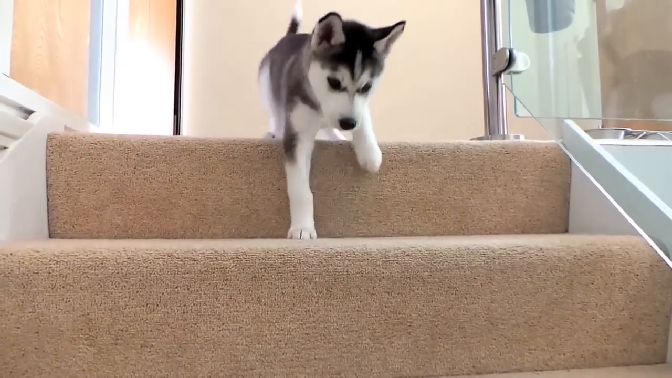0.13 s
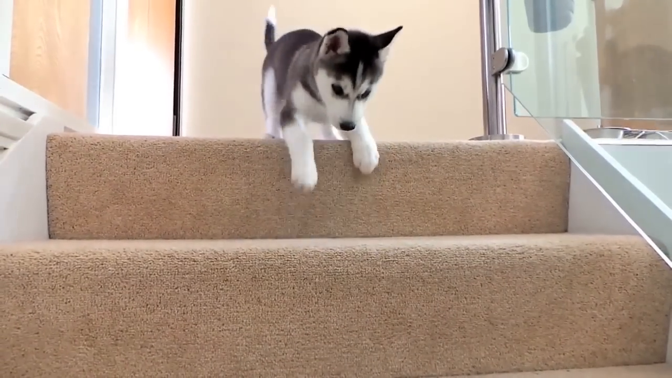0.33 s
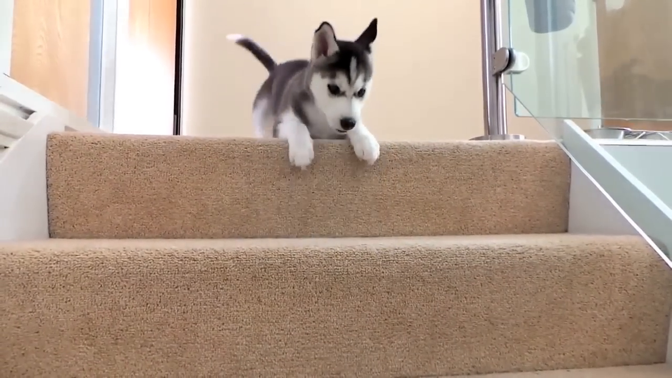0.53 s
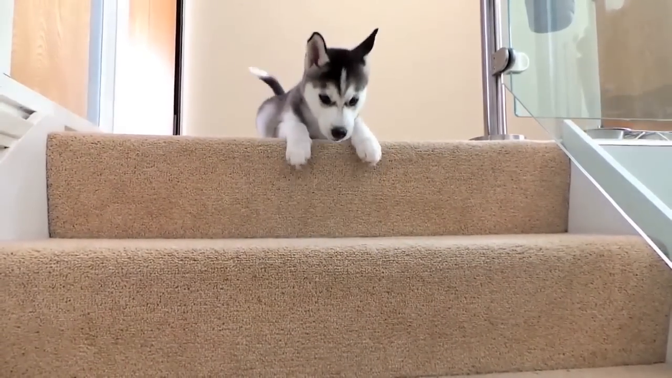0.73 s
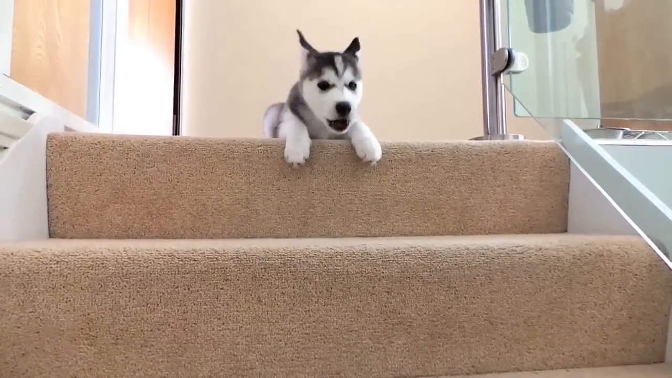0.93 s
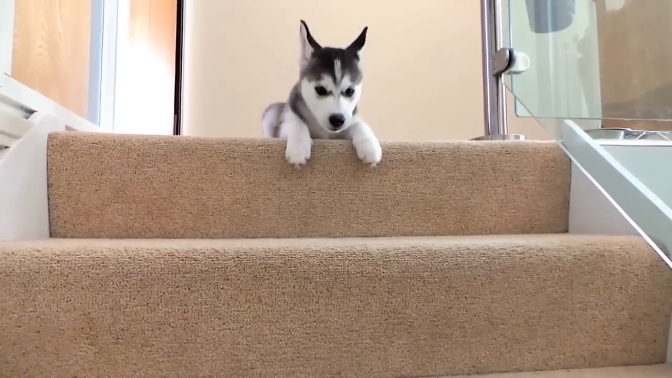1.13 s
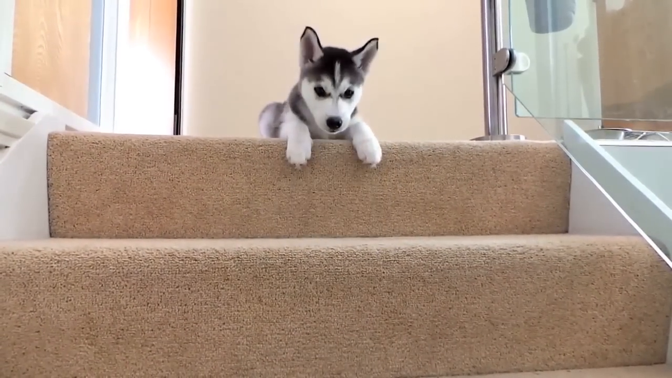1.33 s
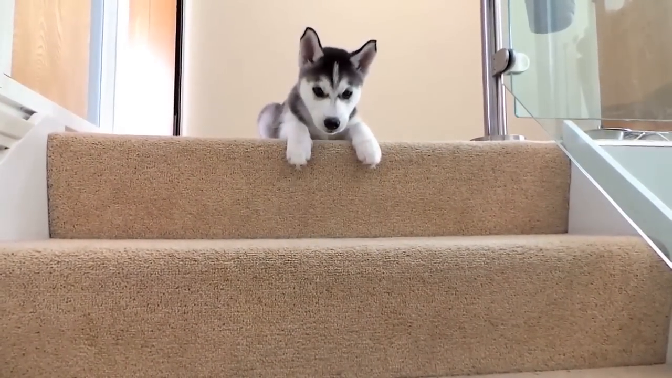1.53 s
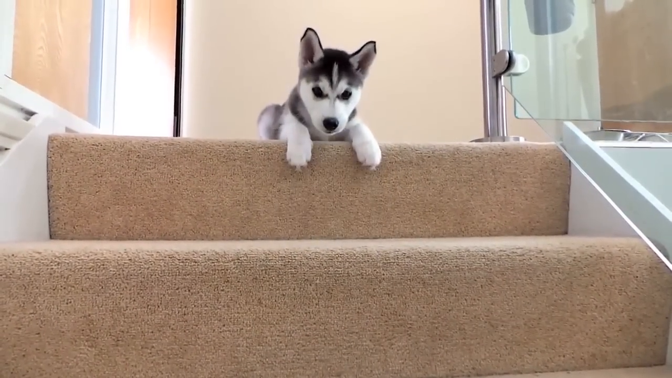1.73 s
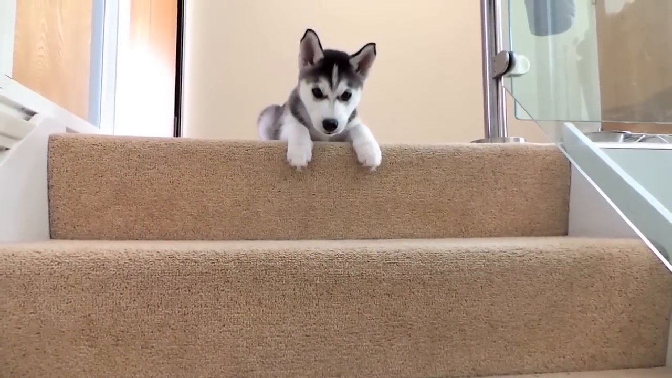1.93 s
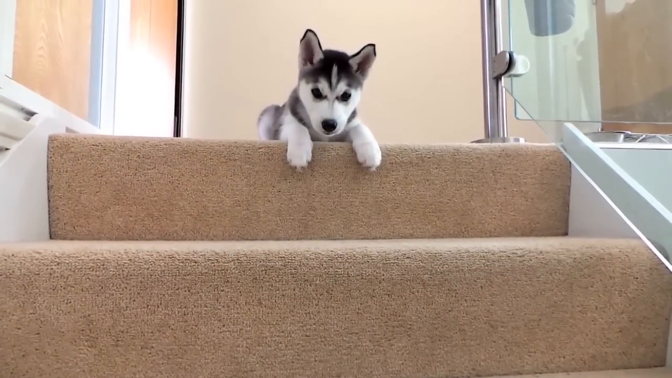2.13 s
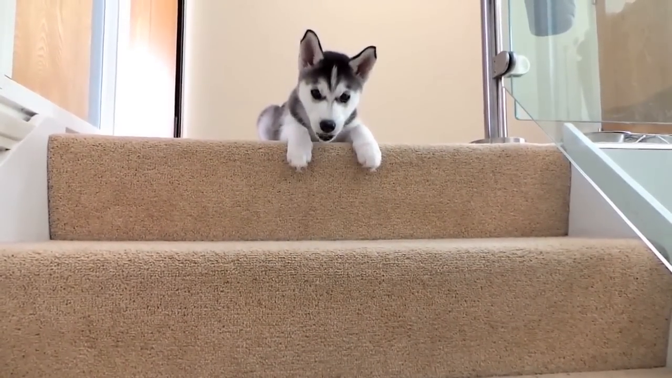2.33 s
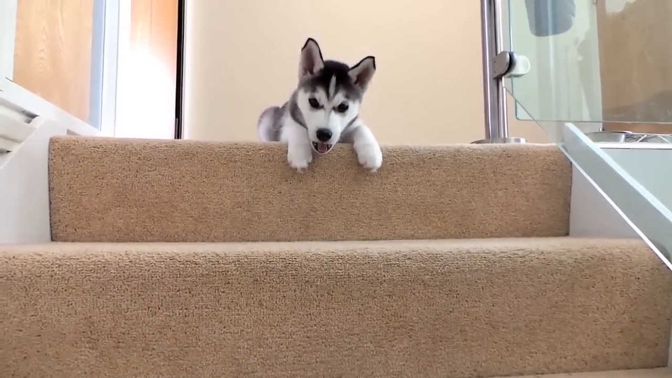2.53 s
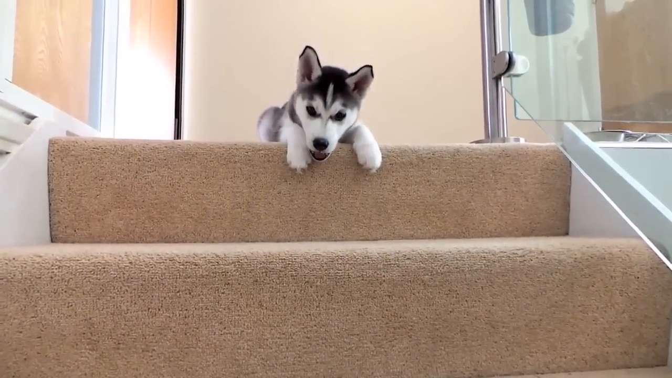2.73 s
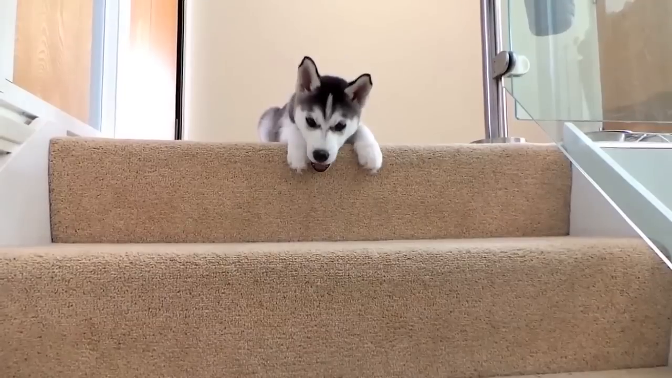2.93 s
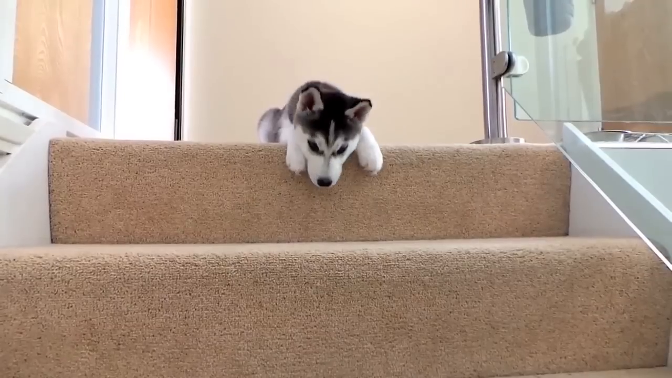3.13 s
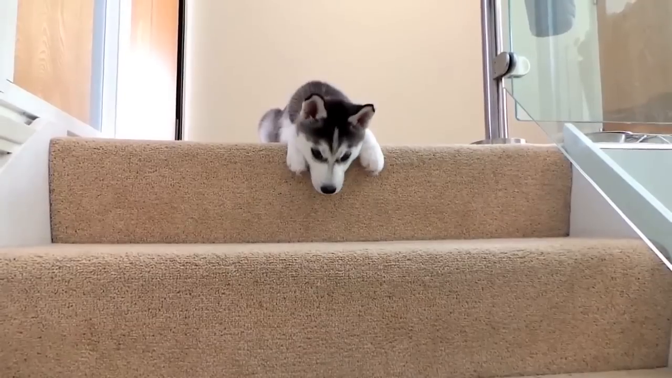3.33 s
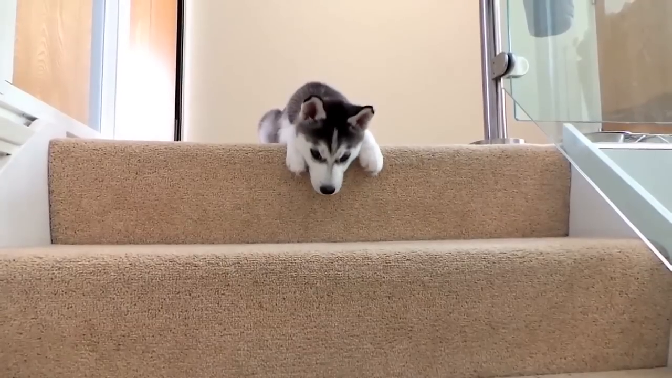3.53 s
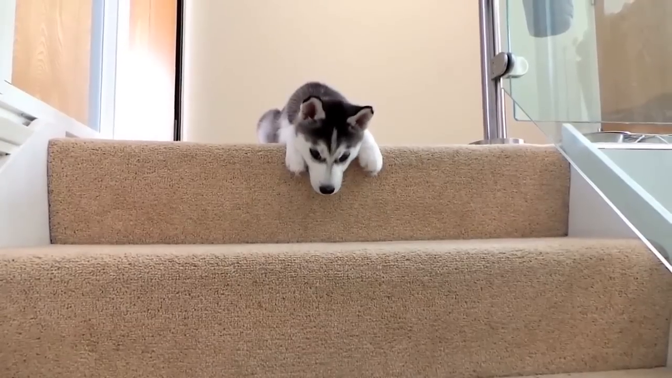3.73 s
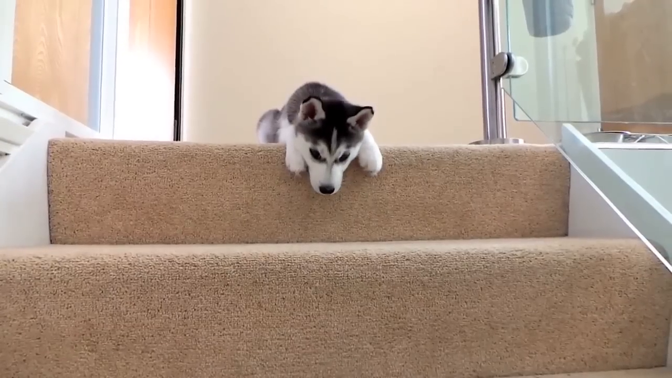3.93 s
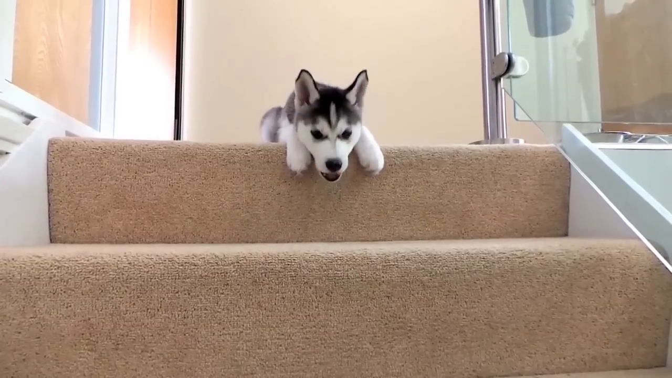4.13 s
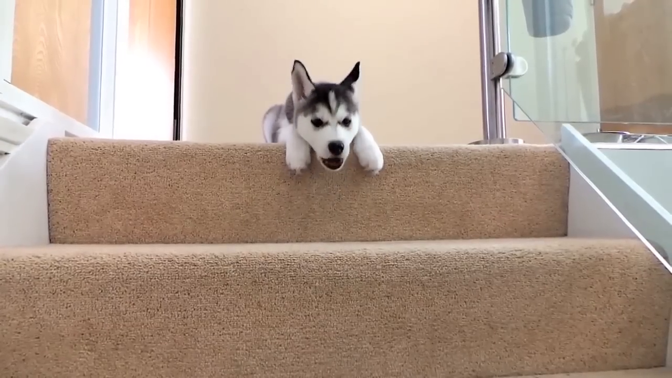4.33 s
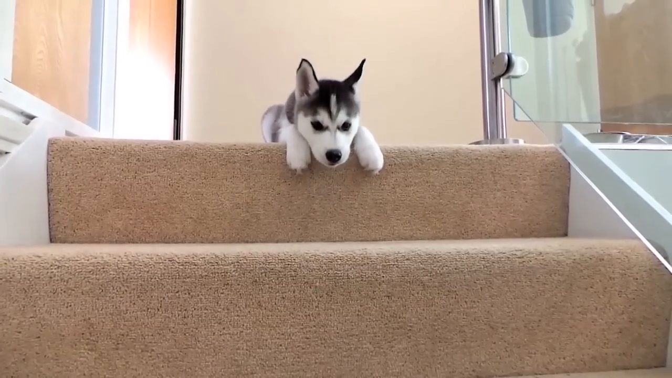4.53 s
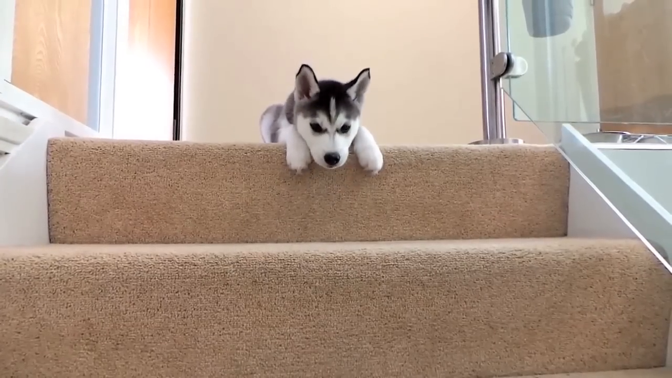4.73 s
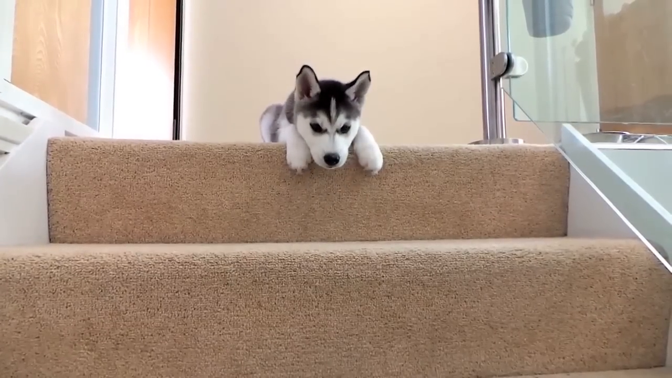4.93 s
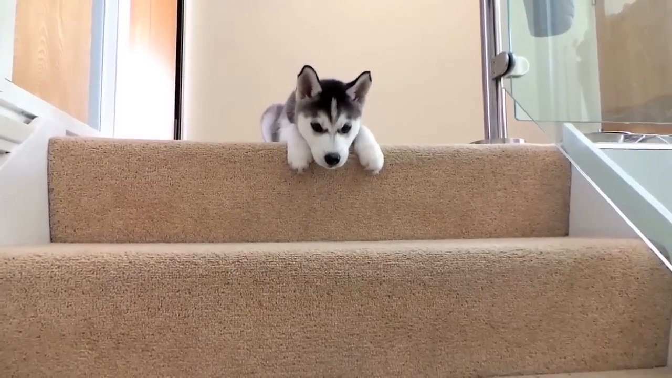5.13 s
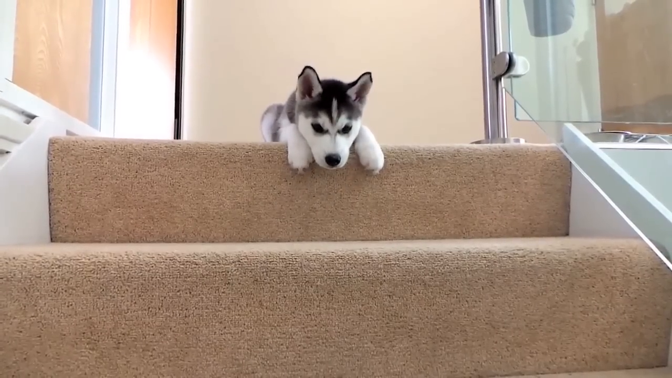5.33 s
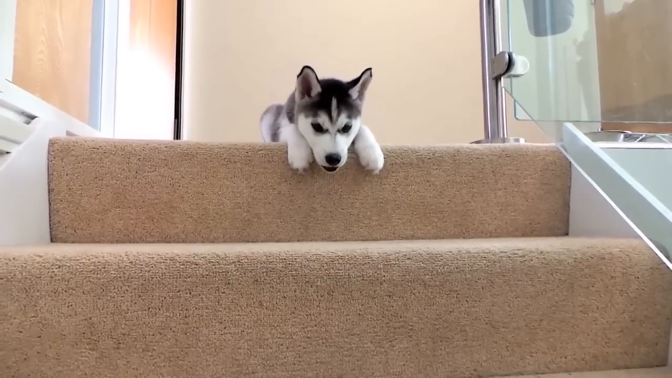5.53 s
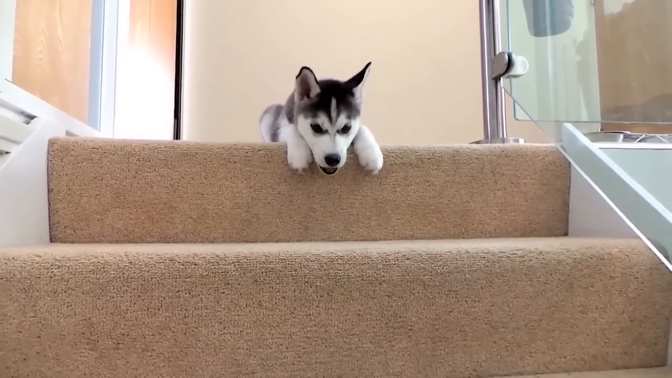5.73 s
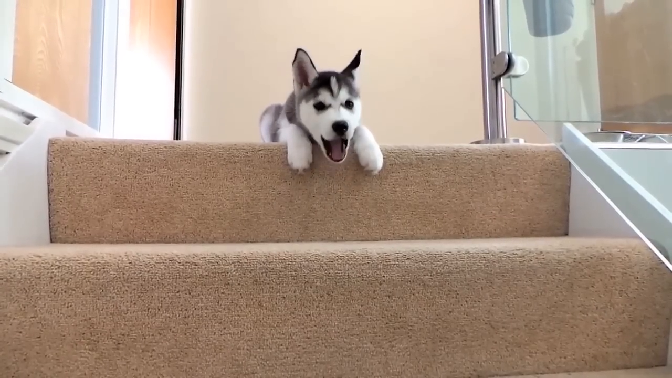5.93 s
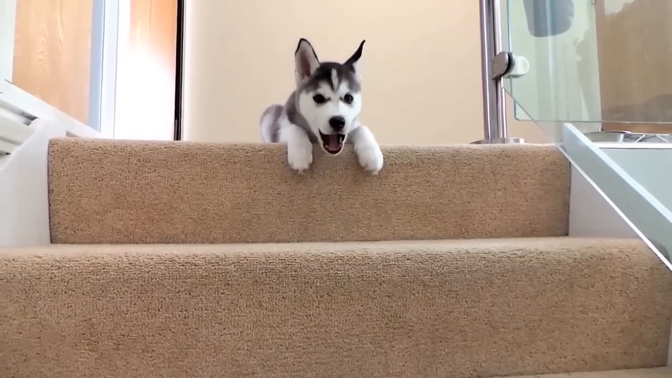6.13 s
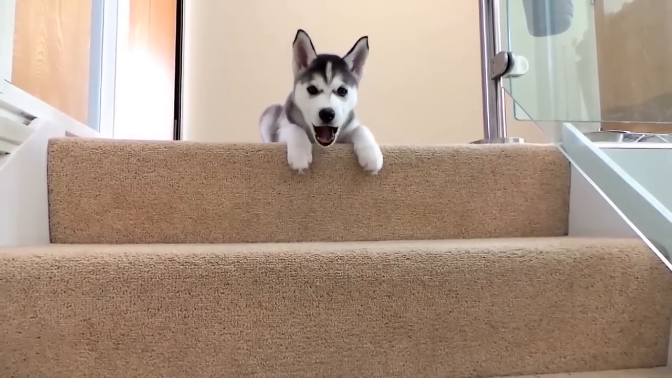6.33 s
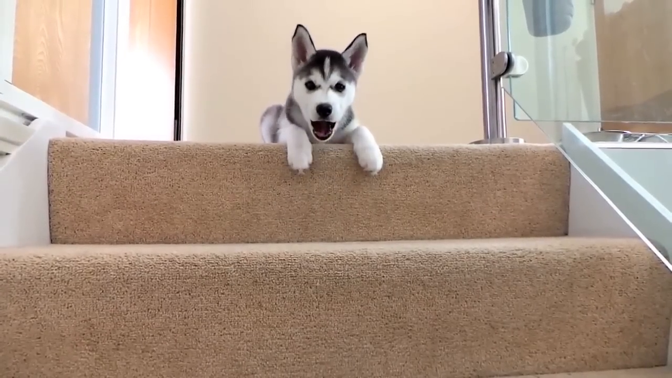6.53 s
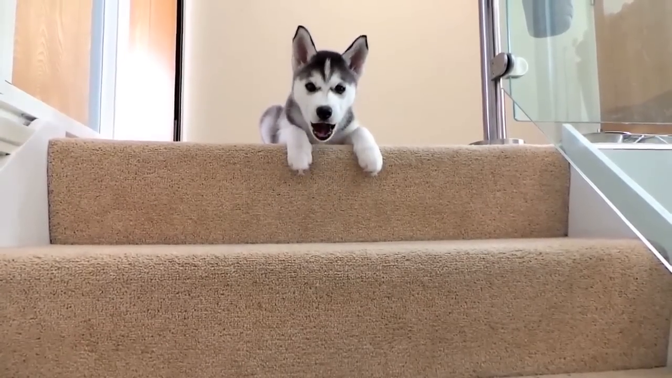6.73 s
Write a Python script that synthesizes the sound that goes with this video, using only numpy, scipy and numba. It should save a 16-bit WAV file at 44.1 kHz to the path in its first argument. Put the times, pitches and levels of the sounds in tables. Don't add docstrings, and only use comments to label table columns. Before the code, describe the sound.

A bare stairwell with short, bright echoes, picked up by a phone a few metres away; very faint mains hum and house rumble sink further in the pauses. Thin airy whistles near the top of hearing flicker at the start. A soft paw thud on carpet at 0.25 s, a firmer one at 0.6, then a faint whimper breaking into a sharp rising yip at 0.95-1.04. Near quiet until 2.45: a small squeak, a quavering high whistle, and a clear yelp at 2.85 that slides down as a whine until 3.4. At 4.1-4.45 two rough barks crack upward, the second dropping into a brief low grumble by 4.6. A barely audible claw tick at 4.98. At 5.63 a thin peep, then two joined piercing yaps at 5.85-6.05, the loudest, and a soft sinking whine from 6.15 to 6.4. Another tiny tick at 6.68 as the room settles.

```python
import sys
import numpy as np
from scipy import signal
from scipy.fft import rfft, irfft
from scipy.io import wavfile
from scipy.ndimage import uniform_filter1d, minimum_filter1d
from numba import njit

SR = 44100
rng = np.random.default_rng(int(sys.argv[2]) if len(sys.argv) > 2 else 0)


def amp(db):
    return 10 ** (np.asarray(db, float) / 20)


def write(x):
    x = np.atleast_2d(x).T
    wavfile.write(sys.argv[1], SR, np.round(np.clip(x, -1, 1) * 32767).astype(np.int16))


N = 303408

# [f/Hz, level/dB]
HOUSE_SPECTRUM = [(25, -20.5), (60, -19), (110, -6), (180, -14.5), (400, -17), (1100, -29.5), (4000, -37.5),
                  (12000, -38.5), (15500, -44.5)]
HOUSE_DB = -57.5
# [f/Hz, level/dB]
HUM = [(49.5, -75.5), (99, -56)]

# [f/Hz, t60/s]
STAIRWELL_DECAY = [(300, 0.7), (1100, 0.44), (3000, 0.3386), (5500, 0.42), (9000, 0.24)]
ECHO_DB, FIRST_ECHO_S = -1.5, 0.009

# [t/s, peak level/dB, thud f/Hz, ring t60/s]
PAW_STEPS = [
    (0.255, -33, 115, 0.088),
    (0.597, -24.5, 198.2, 0.069),
]
# [t/s, peak level/dB]
CLAW_TICKS = [
    (4.979, -51),
    (6.684, -42.5),
]

# [t/s, pitch f/Hz, level/dB, pressing of the voice (overtones against fundamental) level/dB]
WHIMPER = [
    (.612, 677, -45.5, -24.5),
    (.63, 688, -35.5, -35),
    (.655, 800, -32.5, -34.5),
    (.659, 1060, -28, -35.5),
    (.68, 1065, -45.5, -22.5),
    (.685, 728, -40.5, -17.5),
    (.755, 805, -44, -30.5),
    (.805, 746, -46.5, -27.5),
    (.872, 820, -33, -42),
]
YIP = [
    (0.877, 707.6, -49, -17.5),
    (0.926, 737, -39.5, -18.5),
    (0.956, 820, -23, -8.5),
    (0.965, 873, -17.5, -12),
    (0.968, 1054, -10, -41),
    (0.979, 1084, -6, -42.5),
    (.993, 1210, -9.5, -56),
    (0.998, 1437, -29.5, -29.5),
    (1.039, 1427, -14.5, -32),
]
SQUEAK = [
    (2.445, 1618, -42.5, -16.5),
    (2.457, 1656, -27.5, -14),
    (2.474, 1753, -25.5, -13),
    (2.515, 1719, -40.5, -1.5),
]
MURMUR = [
    (2.7, 1320, -74, 6),
    (2.78, 1300, -69, 6),
    (2.845, 1290, -69, 6),
]
YELP = [
    (2.852, 1300, -26, -52.5),
    (2.86, 1368, -13.5, -63),
    (2.9, 1577, -35, -26.5),
    (2.912, 1555, -17, -46),
    (2.925, 1573, -37.5, -44.5),
    (2.948, 1521, -14.5, -53.5),
    (3.002, 1463, -34, -31.5),
]
SLIDE = [
    (3.002, 1473, -22, -64),
    (3.039, 1248, -14.5, -43),
    (3.115, 1178, -23.5, -39.5),
    (3.162, 1092, -31.5, -34),
    (3.2, 1039, -34.5, -19),
    (3.226, 998, -28.5, -22),
    (3.306, 888, -47, -15),
    (3.348, 844, -39.5, -39.5),
    (3.38, 773, -48, -50),
]
BARK = [
    (4.102, 591, -39.5, -12),
    (4.116, 647, -24.5, -0.5),
    (4.134, 706.4, -24.5, -7),
    (4.156, 907, -15, -6.5),
    (4.159, 1120, -12.5, -31.5),
    (4.188, 1120, -15.5, -30),
    (4.211, 1077, -24.5, -20.5),
    (4.25, 920, -28, -25.5),
    (4.285, 697.3, -38.5, -7),
]
BARK_AGAIN = [
    (4.286, 707, -36, -10),
    (4.325, 697, -33, -2.5),
    (4.337, 690.8, -22.5, -22.5),
    (4.368, 770, -34.5, 6.5),
    (4.402, 835.2, -17.5, -11.5),
    (4.405, 1043, -8, -26.5),
    (4.422, 1069, -13.5, -39.5),
    (4.438, 1009, -13.5, -21),
    (4.45, 1076, -15, -40),
]
GRUMBLE = [
    (4.451, 872.5, -30, -17),
    (4.474, 834.1, -35.5, -15.5),
    (4.504, 743, -33, -23),
    (4.52, 614.6, -33, -24.5),
    (4.526, 538, -39, -10),
    (4.552, 504.3, -28.5, -35.5),
    (4.585, 513, -46, -43.5),
]
PEEP = [
    (5.632, 1619, -45, -15),
    (5.646, 1624, -31, -17),
    (5.712, 1703, -31.5, -29.5),
    (5.722, 1700, -49.5, -21.5),
    (5.74, 1638, -34.5, -48.5),
    (5.758, 1355, -48.5, -22.5),
    (5.785, 1408, -28.5, -50.5),
    (5.835, 1464, -55.5, -25.5),
]
YAP = [
    (5.845, 1265, -20.5, -56),
    (5.857, 1242, -12, -64.5),
    (5.866, 1384, -28.5, -37.5),
    (5.882, 1434, -32.5, -16),
    (5.892, 1628, -22.5, -28.5),
    (5.902, 1654, -25.5, -24),
    (5.922, 1607, -36, -23.5),
    (5.934, 1645, -19.5, -31),
    (5.943, 1552, -16.5, -28.5),
]
YAP_AGAIN = [
    (5.945, 1273, -9, -36.5),
    (5.959, 1350, -7, -46),
    (5.965, 1450, -20.5, -36.5),
    (5.975, 1557, -19.5, -18),
    (5.994, 1663, -2.5, -39),
    (6.007, 1631, -18.5, -36.5),
    (6.02, 1548, -17, -44),
    (6.039, 1577, -16.5, -42.5),
    (6.058, 1573, -38, -14),
]
WHINE = [
    (6.155, 1171, -26.5, -41),
    (6.169, 1150, -24.5, -42),
    (6.217, 1114, -30, -36),
    (6.249, 1109, -29, -44),
    (6.296, 1093, -34, -32.5),
    (6.39, 1070, -50, -46.5),
]

# [f/Hz, level/dB]
MOUTH = [(550, -5), (1100, -5), (1600, -3.5), (2300, 0.5), (3200, 8), (3800, -6), (5000, -21)]
# [t/s, octave level/dB, third harmonic level/dB]
JAW = [(0, 1, 2), (0.658, -4.5, -23), (.683, -21.5, -18.5), (.875, 1, -9), (.969, -4.5, -1.5),
       (2.4, -5.5, -28.5), (2.56, -11.5, -16.5), (2.848, 1.5, 9.5), (3.0, -7, -3), (3.15, -11, -20),
       (4.0, 3.5, -8.5), (4.158, 0, 0.5), (4.285, 9, 0.5), (4.404, -6.5, -2.5), (4.451, 10, 9),
       (5.6, -0.5, 4.5), (5.68, -8, -6), (5.84, 1.5, -13), (5.944, -3, 1), (6.1, -10, -14.5)]
# [f/Hz, level/dB]
THROAT = [(500, -26), (1100, -7), (1700, 1.5), (2300, -9.5), (3300, 6.5), (4100, -3.5), (4800, -11.5),
          (5800, -13), (7500, -14), (9000, -24.5), (11000, -36), (15000, -48)]
OCTAVE_PRESS, THIRD_PRESS = 0.48, 0.75
TILT_DB = -4
HOARSE = .004
STRAIN_HZ, STRAIN_POWER = 1450, 5

# [start t/s, length t/s, from f/Hz, to f/Hz, level/dB]
WHISTLES = [(0, 0.11, 10700, 10260, -61), (.135, 0.025, 9660, 10220, -50), (.166, 0.03, 10560, 10450, -64),
            (0.251, 0.047, 10640, 10600, -53), (0.616, .05, 6650, 6900, -62.5),
            (.67, 0.084, 6300, 6200, -66.5), (0.987, 0.089, 8935, 9020, -43.5),
            (1.104, .04, 9750, 9300, -61.5), (2.839, .2, 8750, 8950, -45.5),
            (3.331, 0.035, 9203, 9007, -72.5), (4.142, .055, 9370, 9020, -38),
            (4.201, .12, 9000, 9190, -47), (4.418, 0.052, 8724, 9200, -34),
            (5.613, 0.046, 8860, 8470, -45.5), (5.667, 0.049, 8450, 8518, -50),
            (5.705, .1, 8270, 8210, -53), (5.863, 0.22, 8750, 8890, -39.5), (6.06, .05, 8330, 7970, -46),
            (6.251, 0.091, 9400, 9830, -74.5), (6.333, 0.06, 9343, 9310, -62)]
# [t/s, pitch f/Hz, level/dB]
QUAVER = [
    (2.439, 9100, -42.5),
    (2.529, 8380, -54.5),
    (2.548, 8680, -41.5),
    (2.649, 8250, -50),
    (2.668, 8510, -53.5),
    (2.705, 8050, -42.5),
    (2.736, 8360, -49),
    (2.764, 8030, -41.5),
    (2.84, 8540, -49),
]
RISE_SHARE, HOLD_SHARE, RISE_DB, FALL_DB, FLUTTER_DB = 0.47, 0.12, -6.5, -16.5, 5
SIDEBANDS_DB = [-10, -7, -11, -13, -10, -13.5]

# [f/Hz, level/dB]
AIR = [(1500, -17), (3000, -11), (5000, -4), (6500, 6.5), (8000, 10), (9500, 1), (11000, -6.5),
       (15000, -10)]
# [f/Hz, level/dB]
RASP = [(1500, -17), (3000, -5.5), (4500, -3), (6500, 0), (9000, -6), (12000, -13), (15000, -14.5)]
AIR_DB, STRAIN_AIR_DB = -63.5, -43
RASP_DB, GUST_DB = -37.5, 2.5

# [f/Hz, level/dB]
TREBLE_FLOOR = [(8500, -75.5), (10000, -64.5), (11000, -60.5), (15000, -58)]
GATE_OPEN_DB, GATE_DEPTH_DB, GATE_KNEE_DB, GATE_FALL_S = -49, -10.5, 1, .065
TOP_HZ, CEILING = 14700, .93


def colour(x, points):
    hz, db = np.transpose(points)
    f = np.fft.rfftfreq(len(x), 1 / SR) + 1
    return irfft(rfft(x) * amp(np.interp(np.log(f), np.log(hz), db)), len(x))


def unit(x):
    return x / np.sqrt(np.mean(x ** 2))


def walk(rate):
    k = int(SR / rate)
    held = np.repeat(rng.standard_normal(4096)[:N // k + 1], k)[:N]
    return 1.3 * uniform_filter1d(uniform_filter1d(held, k), k)


def play(notes, edge_s):
    t = np.arange(N) / SR
    hz, gains = np.zeros(N), np.zeros((len(notes[0][0]) - 2, N))
    end = 0
    for note in notes:
        s, pitch, *levels = np.transpose(note)
        a, b = int(s[0] * SR), int(s[-1] * SR)
        hz[end:] = np.interp(t[end:], s, pitch)
        end = b
        gains[:, a:b] = amp(np.array([np.interp(t[a:b], s, db) for db in levels]))
    k = int(edge_s * SR)
    gains = uniform_filter1d(uniform_filter1d(gains, k, axis=1), k, axis=1)
    return uniform_filter1d(hz, k // 2), gains


def house():
    rumble = unit(colour(rng.standard_normal(N), HOUSE_SPECTRUM))
    rumble = amp(HOUSE_DB + 1.5 * walk(9)) * rumble
    clock = 2 * np.pi * np.cumsum(1 + 0.0086 * walk(2)) / SR
    hum = sum(amp(db + 0.83 * walk(13)) * np.sin(hz * clock) for hz, db in HUM)
    return rumble + hum


def stairwell(x):
    t = np.arange(SR) / SR
    centres = np.transpose(STAIRWELL_DECAY)[0]
    tail = 0
    for hz, t60 in STAIRWELL_DECAY:
        band = [(c, 0 if c == hz else -30) for c in centres]
        tail = tail + colour(rng.standard_normal(SR), band) * amp(-60 * t / t60)
    tail = tail * (t > FIRST_ECHO_S)
    return signal.fftconvolve(x, amp(ECHO_DB) * tail / np.sqrt(np.sum(tail ** 2)))[:N]


def paws():
    size = 8192
    out, t = np.zeros(N + size), np.arange(size) / SR
    carpet = [(40, -14.5), (150, -4.5), (450, 0.5), (1200, -18), (5000, -41)]  # (Hz, dB)
    for s, db, hz, t60 in PAW_STEPS:
        scuff = unit(colour(rng.standard_normal(size), carpet))
        thud = np.sin(2 * np.pi * hz * t) * np.exp(-t / 0.0028) + 0.35 * scuff
        swell = 1 - np.exp(-t / 0.001)
        out[int(s * SR):][:size] += amp(db) * thud * amp(-60 * t / t60) * swell
    tick = 2.4 * np.sin(2 * np.pi * 1500 * t) * np.exp(-t / 0.00025)
    for s, db in CLAW_TICKS:
        out[int(s * SR):][:size] += amp(db) * tick
    return out[:N]


def whistle_notes():
    shares = np.array([0, RISE_SHARE, RISE_SHARE + HOLD_SHARE, 1])
    swell_db = np.array([RISE_DB, 0, 0, FALL_DB])
    notes = [np.array(QUAVER)]
    for s, length, start_hz, end_hz, db in WHISTLES:
        glide = start_hz + (end_hz - start_hz) * shares
        notes.append(np.transpose([s + length * shares, glide, db + swell_db]))
    notes = sorted(notes, key=lambda note: note[0, 0])
    return [np.insert(note, [3], AIR_DB, axis=1) for note in notes]


def larynx_whistle(turn, voiced, gusts):
    hz, (level, air) = play(whistle_notes(), edge_s=0.0054)
    high_turn = 2 * np.pi * np.cumsum(hz * (1 + 0.0025 * walk(120))) / SR
    split = 0
    for k, db in zip((-2, -1, 1, 2, 3, 4), SIDEBANDS_DB):
        split = split + amp(db + 3.5 * walk(25)) * np.sin(high_turn + k * turn)
    flutter = amp(FLUTTER_DB * gusts[::-1])
    return level * flutter * (np.sin(high_turn) + voiced * split), air


def air_hiss(air, first, gusts):
    rush = rng.standard_normal(N)
    hiss = air * unit(colour(rush, AIR))
    rasp = amp(RASP_DB) * first * unit(colour(rush[::-1], RASP))
    return amp(GUST_DB * gusts) * (hiss + rasp)


def breath(first, upper, turn):
    puffs = rng.standard_normal(N) * (1 + 0.97 * np.cos(turn))
    return (amp(-9) * upper + amp(-39.5) * first) * unit(colour(puffs, THROAT))


def low_harmonics(hz, first, press, turn):
    mouth_hz, mouth_db = np.transpose(MOUTH)

    def mouth(k):
        return amp(np.interp(np.log(k * hz), np.log(mouth_hz), mouth_db))

    jaw_s, *jaw_db = np.transpose(JAW)
    shape = np.searchsorted(jaw_s, np.arange(N) / SR, side="right") - 1
    jaw = uniform_filter1d(amp(jaw_db)[:, shape], size=200, axis=1) / mouth(1)
    octave = first * press ** OCTAVE_PRESS * mouth(2) * jaw[0]
    third = first * press ** THIRD_PRESS * mouth(3) * jaw[1]
    breaks = walk(70)
    octave = octave * amp(2.1 * breaks[::-1])
    third = third * amp(3.4 * breaks)
    return first * np.sin(turn) + octave * np.sin(2 * turn) + third * np.sin(3 * turn)


def overtones(hz, upper, turn):
    out = np.zeros(N)
    throat_hz, throat_db = np.transpose(THROAT)
    shimmer = 5.9 * walk(70)
    on = upper > 0
    for k in range(4, 18):
        db = np.interp(np.log(k * hz[on]), np.log(throat_hz), throat_db) + TILT_DB * np.log2(k / 4)
        shimmer_db = np.roll(shimmer, k * SR // 7)[on]
        level = upper[on] * amp(db + shimmer_db) * (k * hz[on] < SR / 3)
        out[on] += level * np.sin(k * turn[on] + k * k)
    return out


def puppy():
    calls = [WHIMPER, YIP, SQUEAK, MURMUR, YELP, SLIDE, BARK, BARK_AGAIN, GRUMBLE, PEEP, YAP, YAP_AGAIN, WHINE]
    hz, (first, press) = play(calls, edge_s=0.0049)
    press = np.maximum(press, 0)
    upper = first * press
    strain = np.minimum(hz / STRAIN_HZ, 1) ** STRAIN_POWER
    jitter = 0.0031 * walk(90) + (.005 + HOARSE * np.sqrt(press)) * walk(400)
    shaken_hz = hz * (1 + jitter)
    turn = 2 * np.pi * np.cumsum(shaken_hz) / SR
    voice = low_harmonics(hz, first, press, turn) + overtones(shaken_hz, upper, turn)
    voiced = strain ** .8 * first / (first + amp(-34))
    gusts = walk(40)
    whistle, air = larynx_whistle(turn, voiced, gusts)
    air = air + amp(STRAIN_AIR_DB) * np.sqrt(np.abs(first)) * strain
    return np.sqrt(2) * (voice + whistle) + breath(first, upper, turn) + air_hiss(air, first, gusts)


def scene():
    near = amp(1.8) * puppy() + paws()
    return (near + stairwell(near) + house())[None]


@njit
def follow(x, fall):
    y, e = np.empty(len(x)), 0.
    for i in range(len(x)):
        e = x[i] if x[i] > e else e + (x[i] - e) * fall
        y[i] = e
    return y


def noise_gate(x):
    above = colour(x, [(150, -27.5), (600, -3), (5000, 3.0), (9000, 9)])
    heard_db = 10 * np.log10(uniform_filter1d(above ** 2, 1024) + 1e-12)
    loud_enough = .5 + .5 * np.tanh((heard_db - GATE_OPEN_DB) / GATE_KNEE_DB)
    opened = follow(loud_enough, 1 / (GATE_FALL_S * SR))
    return x * amp(GATE_DEPTH_DB * (1 - opened))


def limit(x):
    room = np.minimum(1, CEILING / (np.abs(x) + 1e-9))
    return x * uniform_filter1d(minimum_filter1d(room, size=601), size=601)


def drop_faint_treble(x):
    f, _, z = signal.stft(x, SR, nperseg=2048)
    power = np.abs(z) ** 2
    patch = uniform_filter1d(power, size=5, axis=0) / (power.sum(axis=0) + 1e-18)
    patch_db = 10 * np.log10(np.abs(patch) + 1e-18)
    edge_db = np.interp(f, *np.transpose(TREBLE_FLOOR), left=-200)[:, None]
    kept = .5 + .5 * np.tanh(patch_db - edge_db)
    return signal.istft(z * kept, SR, nperseg=2048)[1][:N]


def roll_off(x):
    return signal.sosfilt(signal.butter(12, 15640, fs=SR, output="sos"), x)


def record(dry):
    gated = noise_gate(dry[0])
    low_pass = signal.ellip(8, .2, 60, TOP_HZ, fs=SR, output="sos")
    limited = limit(signal.sosfilt(low_pass, gated))
    return roll_off(drop_faint_treble(limited)[None])


dry = scene()
out = record(dry)
write(out)
```